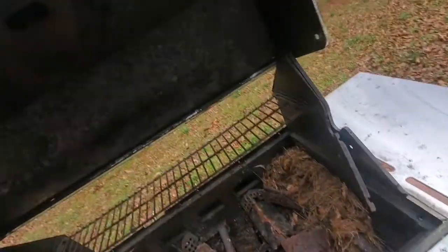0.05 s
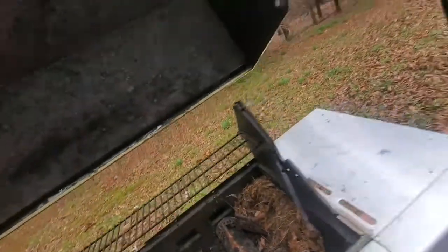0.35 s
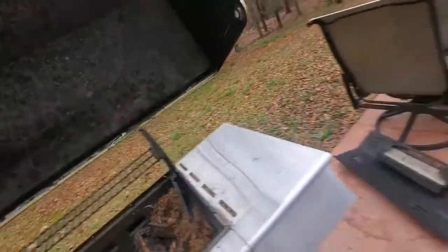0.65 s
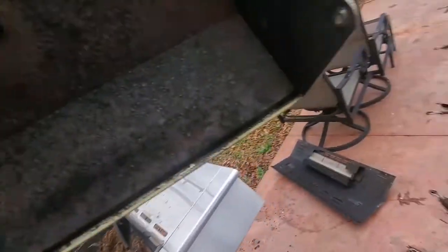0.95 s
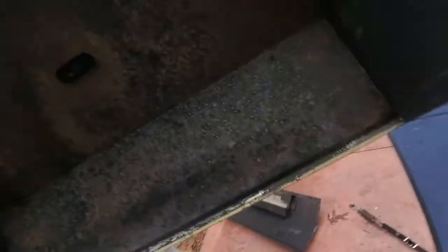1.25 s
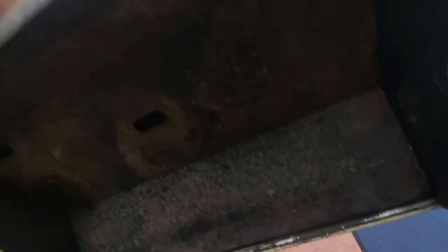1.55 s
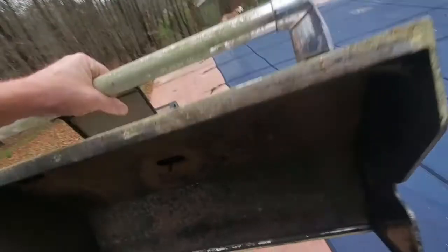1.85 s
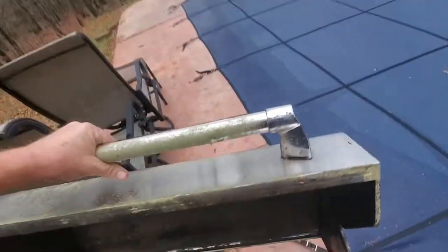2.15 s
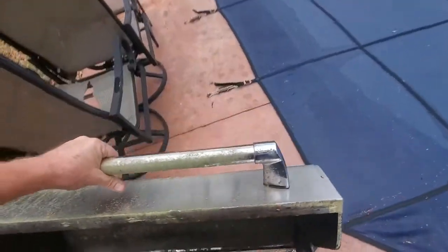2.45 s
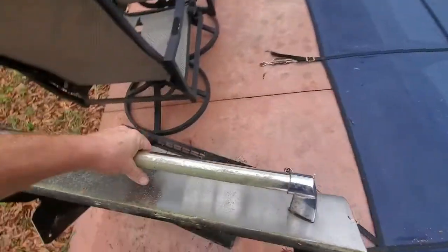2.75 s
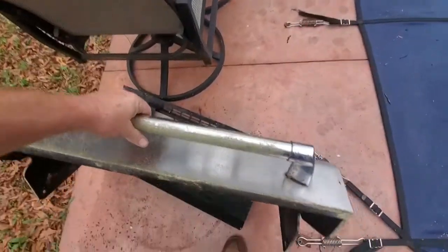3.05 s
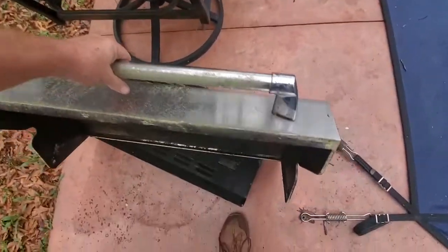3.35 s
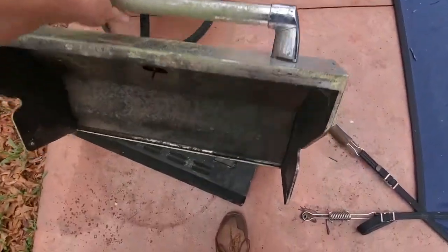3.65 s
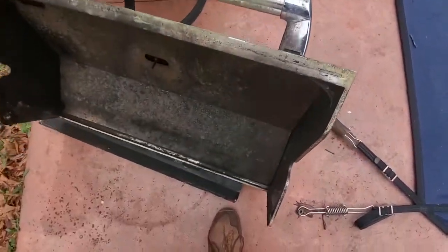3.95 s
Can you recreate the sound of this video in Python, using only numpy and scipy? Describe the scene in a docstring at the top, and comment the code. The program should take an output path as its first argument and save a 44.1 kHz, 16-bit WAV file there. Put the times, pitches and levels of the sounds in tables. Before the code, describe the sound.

A metal grill lid scrapes off, rings faintly, then clatters down and drags over concrete.

```python
"""A sheet-metal grill lid on an open patio, a little left of a stereo microphone.
Dragged off its firebox, its edge judders over grit and shakes the shell; knocks leave it ringing
as it is carried, and shoes scuff. Then it clatters down and is scraped over the concrete.
Thin falling whistles, probably birds, come from some way off with a diffuse outdoor tail.
Light wind rumbles on the microphone throughout."""
import sys
import numpy as np
from scipy import signal
from scipy.fft import rfft, irfft
from scipy.io import wavfile

SR = 44100
rng = np.random.default_rng(int(sys.argv[2]) if len(sys.argv) > 2 else 0)


def put_to_file(sound):
    """Save the sound as 16-bit audio at rate SR, in the file named by the first command-line argument."""
    columns = np.atleast_2d(sound).T  # one column per channel
    safe = np.clip(columns, -1, 1)
    whole_steps = np.round(safe * 32767)
    wavfile.write(sys.argv[1], SR, whole_steps.astype(np.int16))


N = 176400
T = np.arange(N) / SR
BODY_PAN_DB, CONTACT_PAN_DB = 2.5, 1.2  # left minus right

# knocks of the lid on firebox and ground: start_s, clang_db, crack_db
LID_KNOCKS = [(.142, -30, -25.5), (.241, -30.5, -29), (.251, -27.5, -48), (0.274, -37, -22),
              (.372, -36.5, -42.5), (3.297, -18.5, -29), (3.37, -18, -31), (3.379, -7, -23),
              (3.385, -10, -43), (3.397, -21, -31), (3.425, -16, -14), (3.438, -17, -23.5),
              (3.667, -25, -30.5)]
# colour of shoe scuffs and small ticks: frequency_hz, level_db
SCUFF_SPECTRUM = [(200, 2.5), (600, -8), (1000, -5), (2000, -1.5), (3200, -2), (5000, -7), (7500, -13.5),
                  (10000, -9), (15000, -17.5)]
# white noise: frequency_hz, level_db
FLAT_SPECTRUM = [(1, 0)]


def from_db(db):
    """Decibels to gain."""
    return 10 ** (np.asarray(db) / 20)


def at_hz(points, hz):
    """Read a table on a log-frequency axis."""
    frequencies, values = np.transpose(points)
    return np.interp(np.log(np.maximum(hz, 1)), np.log(frequencies), values)


def pan(db):
    """Left and right gains, db apart."""
    return from_db(np.array([[db], [-db]]) / 2)


def off_centre(x, lag_s=.00025):
    """The lid is left of the microphone: louder on that side, later on the right."""
    left, right = x * pan(BODY_PAN_DB)
    return np.array([left, np.pad(right, (round(lag_s * SR), 0))[:N]])


def filtered(x, order, hz, kind="low"):
    """Butterworth filter."""
    return signal.sosfilt(signal.butter(order, hz, kind, fs=SR, output="sos"), x)


def drift(rate_hz):
    """A smooth random wander with spread 1."""
    r = np.exp(-2 * np.pi * rate_hz / SR)
    x = signal.lfilter([1], [1, -2 * r, r * r], rng.standard_normal(N + SR))[SR:]
    return x / x.std()


def noise(spectrum):
    """Coloured stereo noise, alike in the bass and wide in the treble; rms 1."""
    # likeness of left and right at the microphone: frequency_hz, correlation
    likeness = [(30, .8), (130, 0.98), (290, 0.91), (640, 0.75), (1400, 0.03)]
    hz = np.arange(N // 2 + 1) * SR / N
    alike = np.clip(at_hz(likeness, hz), -1, 1)
    mid, side = rfft(rng.standard_normal((2, N)))
    stereo = np.sqrt(1 + alike) * mid + np.sqrt(1 - alike) * side * [[1], [-1]]
    x = irfft(from_db(at_hz(spectrum, hz)) * stereo, N)
    return x / x.std()


def response(spectrum, t60):
    """A dying burst of crowded resonances, with unit energy."""
    x = (noise(spectrum) * from_db(-60 * T / t60))[:, :SR]
    return x / np.sqrt(np.sum(x ** 2) / 2)


def through(x, body):
    """Let a force or a sound excite a body."""
    return signal.fftconvolve(np.atleast_2d(x), body, axes=1)[:, :N]


def mode(force, hz, t60):
    """One resonance: a unit click sets a sine of height 1 ringing."""
    r, w = from_db(-60 / (t60 * SR)), 2 * np.pi * hz / SR
    return signal.lfilter([0, np.sin(w)], [1, -2 * r * np.cos(w), r * r], force + 1e-18)


def blows(times, db):
    """One click of force for each blow."""
    force = np.zeros(N)
    force[np.clip((times * SR).astype(int), 0, N - 1)] = from_db(db)
    return force


def strikes(times, db, spectrum, t60):
    """Each blow starts its own dying burst of noise."""
    power = np.zeros(N)
    for start_s, level_db in zip(times, db):
        start = int(start_s * SR)
        power[start:] += from_db(level_db - 60 * T[:N - start] / t60) ** 2
    return np.sqrt(power) * noise(spectrum)


def swells(rows, spectrum):
    """Short grainy swells of friction."""
    power = sum(from_db(db) ** 2 * np.exp(-2 * ((T - peak_s) / half_s) ** 2)
                for peak_s, half_s, db in rows)
    return np.sqrt(power) * from_db(2.4 * drift(180)) * noise(spectrum)


def panels(dull, sharp):
    """The panels ring to a soft and a hard force; each mode has its own strength left and right."""
    # panel modes while an edge is in contact: pitch_hz, level_db, t60_s
    panel_modes = [(311.5, -17.5, .2), (636.5, -11, .2), (731, -15.5, 0.15), (912, -17, 0.28),
                   (1113, -17, 0.43), (1224, -18, 0.38), (1606, -21.5, 0.43), (1930, -18.5, .3),
                   (2175, -24.5, 0.47)]
    force = filtered(dull + 1e-18, 2, 900) + sharp
    return sum(from_db(db + 2 * rng.standard_normal((2, 1))) * mode(force, hz, t60)
               for hz, db, t60 in panel_modes)


def scrape(levels, shell_spectrum, grit_spectrum, grit_pan_db, contacts=3, grains_per_s=2500):
    """The juddering edge catches on grains, which shake the shell and crunch at several contacts."""
    times, shell_db, grit_db = np.transpose(levels)
    grains = (rng.random(N) < grains_per_s / SR) * rng.choice([-1, 1], N)
    grains = grains * from_db(2 * np.minimum(rng.exponential(1, N), 4))  # a few catch harder
    grains *= from_db(1.16 * drift(rate_hz=58))  # judder
    grains = grains / grains.std() * (T >= times[0]) * (T <= times[-1])
    shudder = grains * from_db(np.interp(T, times, shell_db))
    crunch = grains * from_db(np.interp(T, times, grit_db))
    shell = through(shudder, response(shell_spectrum, t60=.086))
    shell += from_db(-28.5) * panels(shudder, crunch)
    contact = rng.integers(0, contacts, N)
    grit = sum(through(crunch * (contact == k), response(grit_spectrum, t60=.02))
               for k in range(contacts))
    return off_centre(shell) + grit * pan(grit_pan_db)


def firebox_slide():
    """The lid's edge scrapes off the firebox."""
    # course of the slide: time_s, shell_db, grit_db
    levels = [(0, -20.5, -22.5), (.03, -32, -32), (.055, -26.5, -27.5), (.085, -35, -30.5),
              (.135, -27.5, -29.5), (.155, -23.5, -23), (.2, -29.5, -29), (.29, -27, -33.5),
              (.33, -30, -38.5), (.4, -40, -79), (.45, -100, -100)]
    # shudder of the shell: frequency_hz, level_db
    shell_spectrum = [(100, -38.5), (172, 6.5), (237, -15.5), (380, -3), (480, -10), (579, -5),
                      (890, -12.5), (1400, -21.5), (2400, -100)]
    # crunch at the edge: frequency_hz, level_db
    grit_spectrum = [(1250, -20.5), (1600, -7), (2080, -12), (4100, -19.5), (7930, -27.5), (10500, -21.5),
                     (15800, -31)]
    return scrape(levels, shell_spectrum, grit_spectrum, grit_pan_db=.2)


def wind_and_air():
    """Light wind rumbles on the microphone over faint open-air hiss."""
    # wind rumble: frequency_hz, level_db
    wind_spectrum = [(22, -40.5), (40, -8), (62, 3), (88, -3), (125, -12.5), (250, -24.5), (500, -39)]
    # patio hiss: frequency_hz, level_db
    air_spectrum = [(200, 1.5), (3000, 2), (5000, -8), (10000, -6), (15000, -16.5)]
    rumble = filtered(noise(wind_spectrum), 2, 500)
    return from_db(-46.5) * rumble * pan(1.6) + from_db(-72) * noise(air_spectrum)


def knocks():
    """The lid bumps the firebox and the ground: a dull clang, ringing panels and a sharp crack."""
    # dull clang: frequency_hz, level_db
    clang_spectrum = [(76, -67), (130, -23.5), (325, 0.5), (470, -3), (650, 0), (950, -11), (1180, -9.5),
                      (1450, -21), (1970, -17.5), (3200, -100)]
    # sharp crack: frequency_hz, level_db
    crack_spectrum = [(650, 0), (1940, -0.5), (2430, -9.5), (3320, -3.5), (3750, -7.5), (10800, -15.5),
                      (15800, -17.5)]
    times, clang_db, crack_db = np.transpose(LID_KNOCKS)
    clang = strikes(times, clang_db, clang_spectrum, t60=.14)
    ring = panels(blows(times, clang_db) * rng.choice([-1, 1], N), blows(times, crack_db))
    crack = strikes(times, crack_db, crack_spectrum, t60=.1)
    snap = strikes(times, crack_db - 1, crack_spectrum, t60=.025)
    return (clang + ring) * pan(BODY_PAN_DB) + (crack + snap) * pan(CONTACT_PAN_DB)


def lid_ring(landing_s=3.28, grounded_db=-25.5):
    """Knocks ring a few clear modes in a diffuse wash: strongly in the air, weakly on the ground."""
    # modes of the free lid: pitch_hz, level_db, t60_s
    lid_modes = [(92.4, -15, 4.16), (240.7, -6.5, 4), (304.2, -23, 4.5), (386, -12, 2.2), (410.5, -13.5, 3),
                 (428, -10.5, 3.4), (450.6, -8.5, 4.3), (1600, -20, 1.2), (2170, -20.5, 1.2)]
    # its wash of weaker modes: frequency_hz, level_db
    wash_spectrum = [(130, -19), (380, -9), (620, -18), (1000, -24), (1800, -16.5), (3000, -21),
                     (5500, -42)]
    # decay of the wash: frequency_hz, t60_s
    wash_decay = [(150, 4.05), (450, 3.2), (800, 2), (1600, 0.99), (5500, 0.73)]
    body = sum(rng.choice([-1, 1]) * from_db(db) * mode(T == 0, hz, t60) for hz, db, t60 in lid_modes)
    edges_hz, white = np.geomspace(130, 6500, 15), noise(FLAT_SPECTRUM)
    for low, high in zip(edges_hz, edges_hz[1:]):
        band = filtered(white, 4, [low, high], "band")
        centre_hz = np.sqrt(low * high)
        band_db = at_hz(wash_spectrum, centre_hz) - 60 * T / at_hz(wash_decay, centre_hz)
        body = body + band / band.std() * from_db(band_db)
    times, clang_db, _ = np.transpose(LID_KNOCKS)
    return through(blows(times, clang_db + grounded_db * (times > landing_s)), body)


def handling():
    """Steps and handling thump softly; the grip rubs the handle and the hand bumps the lid once."""
    # soft thumps: start_s, level_db, pitch_hz, t60_s
    thuds = [(0.142, -22, 64.4, 0.43), (0.233, -30, 65.4, 0.22), (2.725, -30.5, 83.3, 0.26),
             (2.726, -36.5, 214, 0.072), (2.811, -27, 73, 0.071)]
    # rubs of the grip: peak_s, half_length_s, level_db
    rubs = [(1.33, 0.12, -60.5), (1.78, 0.57, -63)]
    # colour of a rub: frequency_hz, level_db
    rub_spectrum = [(300, -11), (650, -1), (1150, -12), (1600, -33), (5000, -71)]
    # colour of the bump: frequency_hz, level_db
    bump_spectrum = [(60, -20.5), (200, -1), (450, 7.5), (600, -13), (850, -15), (2000, -76)]
    thumps = sum(mode(blows(np.array([start_s]), db), hz, t60) for start_s, db, hz, t60 in thuds)
    rubbing = swells(rubs, rub_spectrum)
    bump = strikes(times=[1.745], db=[-36], spectrum=bump_spectrum, t60=.28)
    return filtered(thumps, 2, 300) + rubbing + bump


def scuffs():
    """Soles brush the concrete."""
    # shoe scuffs and rustles: peak_s, half_length_s, level_db
    brushes = [(0.65, 0.41, -69.5), (1.74, 0.13, -64.5), (1.994, 0.033, -53.5), (2.04, 0.19, -64.5),
               (2.167, 0.026, -54.5), (2.308, 0.025, -49), (2.334, 0.029, -43.5)]
    return swells(brushes, SCUFF_SPECTRUM)


def distant_whistles(clean_db=-58, roughness_per_db=.12, chirp_fade_db=9):
    """Thin, mostly falling whistles, probably birds, with an outdoor tail; weaker ones are rougher."""
    # whistles some way off, one curve each: time_s, pitch_hz, level_db
    curves = [
        [(2.26, 4050, -68), (2.33, 3530, -50), (2.39, 3060, -55), (2.47, 2760, -61), (2.53, 2470, -52),
         (2.6, 2240, -52), (2.65, 2080, -52), (2.675, 2060, -70)],
        [(2.92, 2350, -70), (2.98, 2760, -50), (3.005, 2650, -66)],
        [(3.003, 1750, -68), (3.026, 2000, -48), (3.11, 1760, -50), (3.135, 1680, -63), (3.22, 1430, -68),
         (3.29, 1380, -70)],
    ]
    # short chirps: start_s, length_s, first_hz, last_hz, peak_db
    chirps = [(.5, .65, 3470, 3000, -71), (.58, .17, 5400, 5200, -78), (.87, .07, 11300, 10600, -76),
              (1.185, .045, 2500, 3600, -75), (1.435, .045, 2100, 3100, -77), (1.47, .12, 7300, 7200, -73),
              (2.09, .07, 5700, 4950, -66), (2.305, .04, 3700, 3250, -44), (2.72, .4, 3480, 3150, -70)]
    # strength of the fourth and fifth partials: frequency_hz, level_db
    partials = [(7500, -42), (9300, -27.5), (14000, -40)]
    wobble, flutter_db = .008 * drift(150), 3 * drift(60)
    rasp = 1 + from_db(-17) * (drift(400) + 1j * drift(400))
    chirp_curves = [[(start_s, first_hz, db - chirp_fade_db),
                     (start_s + length_s / 2, (first_hz + last_hz) / 2, db),
                     (start_s + length_s, last_hz, db - chirp_fade_db)]
                    for start_s, length_s, first_hz, last_hz, db in chirps]
    direct = np.zeros(N)
    for curve in curves + chirp_curves:
        times, hz, db = np.transpose(curve)
        on = (T >= times[0]) & (T <= times[-1])
        pitch_hz, level_db = np.interp(T[on], times, hz), np.interp(T[on], times, db)
        roughness = 1 + roughness_per_db * np.maximum(clean_db - level_db, 0)
        phase = 2 * np.pi * np.cumsum(pitch_hz * (1 + roughness * wobble[on])) / SR
        upper = sum(from_db(at_hz(partials, k * pitch_hz)) * np.exp(1j * k * phase) for k in (4, 5))
        tone = np.sqrt(2) * np.imag(rasp[on] * (np.exp(1j * phase) + upper))
        direct[on] += tone * signal.windows.tukey(on.sum(), .1) * from_db(level_db + flutter_db[on])
    tail = through(direct, response(FLAT_SPECTRUM, t60=1.1))
    return from_db(-6) * direct + from_db(-10) * tail


def ticks():
    """The handle and the loose sheet tick while the lid is carried."""
    # small ticks: start_s, level_db
    tick_events = [(.517, -58), (1.518, -64.5), (2.913, -49.5)]
    return strikes(*np.transpose(tick_events), SCUFF_SPECTRUM, t60=.039)


def concrete_drag():
    """The grounded lid scrapes over the concrete in jerks."""
    # course of the drag: time_s, shell_db, grit_db
    levels = [(3.29, -37, -35), (3.3, -27, -29), (3.355, -27, -43), (3.38, -29, -44), (3.45, -27.5, -34),
              (3.495, -30.5, -36.5), (3.59, -28, -34), (3.655, -35, -43.5), (3.672, -23.5, -27.5),
              (3.705, -31.5, -42), (3.735, -30.5, -33), (3.85, -31, -38), (3.875, -23, -34.5),
              (3.91, -34, -31.5), (3.96, -23.5, -30.5), (4, -33, -34)]
    # shudder of the shell: frequency_hz, level_db
    shell_spectrum = [(47, -46), (80, -13.5), (150, -9), (189, -3.5), (260, -9.5), (301, 0), (435, -14),
                      (640, -4), (800, -8), (1400, -14), (2700, -100)]
    # crunch on concrete: frequency_hz, level_db
    grit_spectrum = [(880, -39), (1500, -25), (1620, -1), (2220, -1), (2530, -6), (3360, -5), (7260, -13.5),
                     (11000, -11), (15800, -15)]
    return scrape(levels, shell_spectrum, grit_spectrum, CONTACT_PAN_DB)


def scene():
    """The patio at the microphone: the lid is pulled off, carried and set down."""
    contact = firebox_slide() + concrete_drag() + knocks()
    carrying = off_centre(lid_ring() + handling()) + ticks()
    return contact + carrying + distant_whistles() + scuffs() + wind_and_air()


def record(dry, cutoff_hz=15900):
    """The recorder thins the deepest bass, rounds the highest peaks and cuts the top."""
    rounded = np.tanh(filtered(dry, 3, 40, "high"))
    return signal.sosfilt(signal.ellip(12, .1, 80, cutoff_hz, fs=SR, output="sos"), rounded)


dry = scene()
out = record(dry)
put_to_file(out)
```